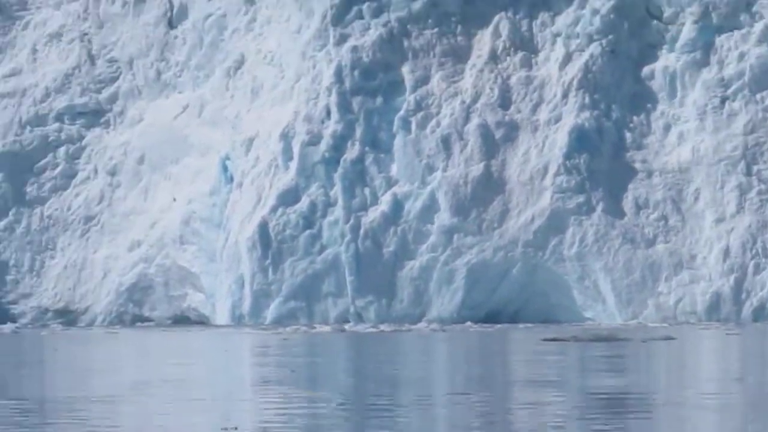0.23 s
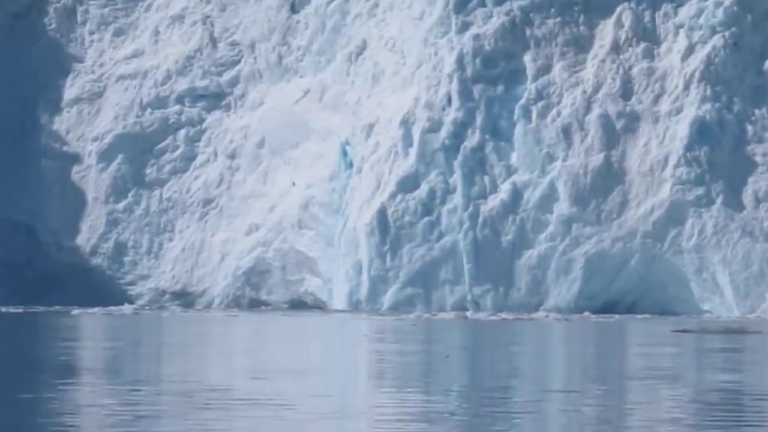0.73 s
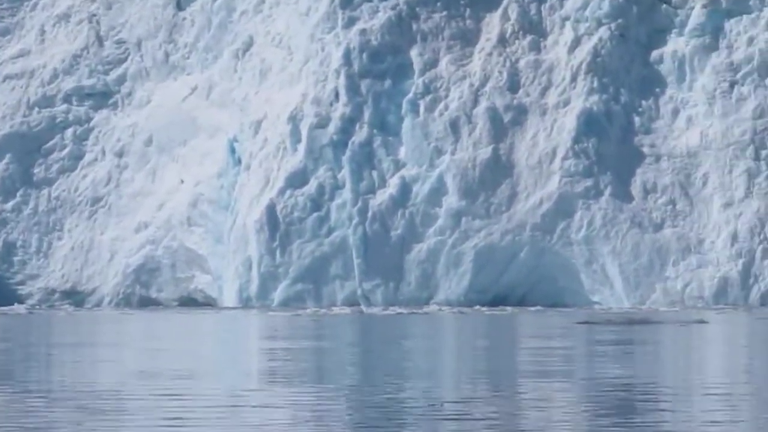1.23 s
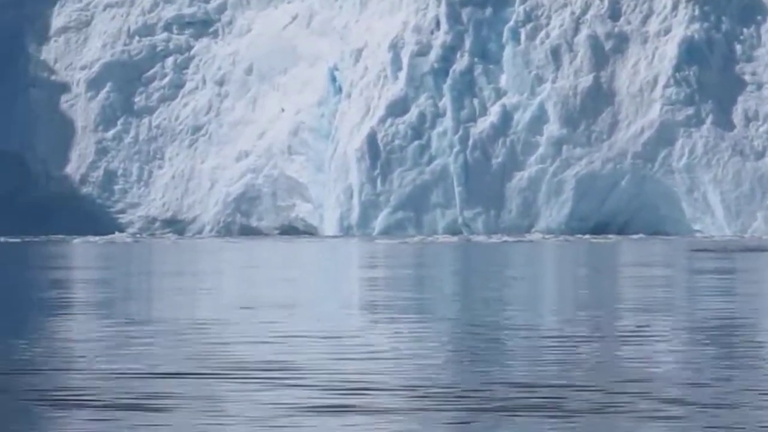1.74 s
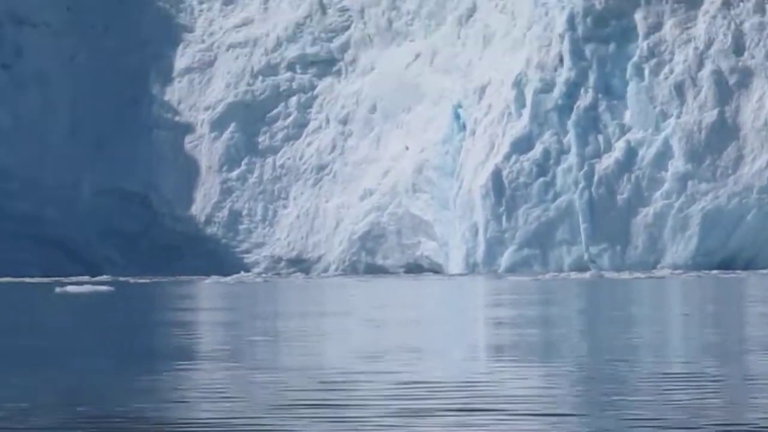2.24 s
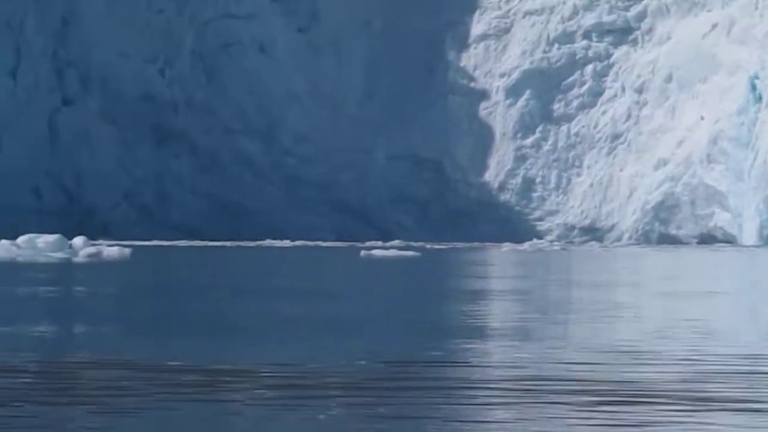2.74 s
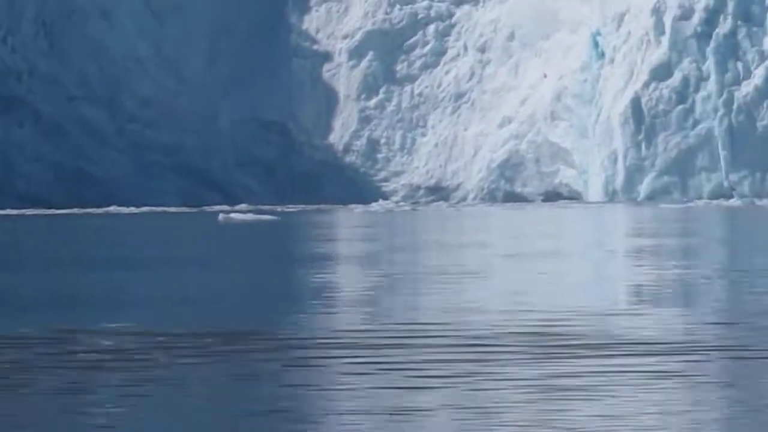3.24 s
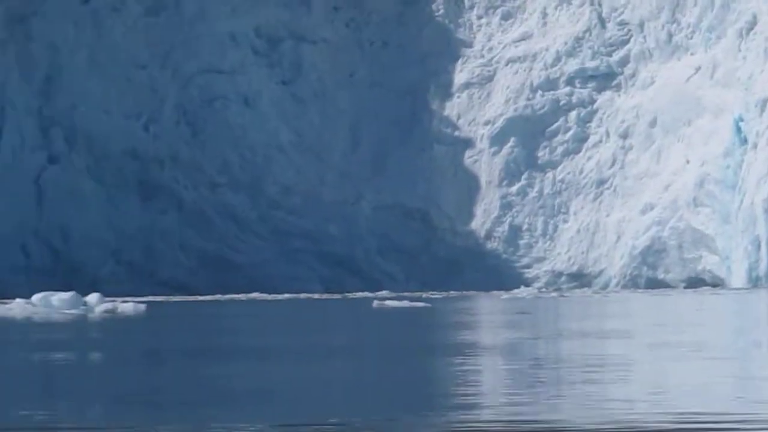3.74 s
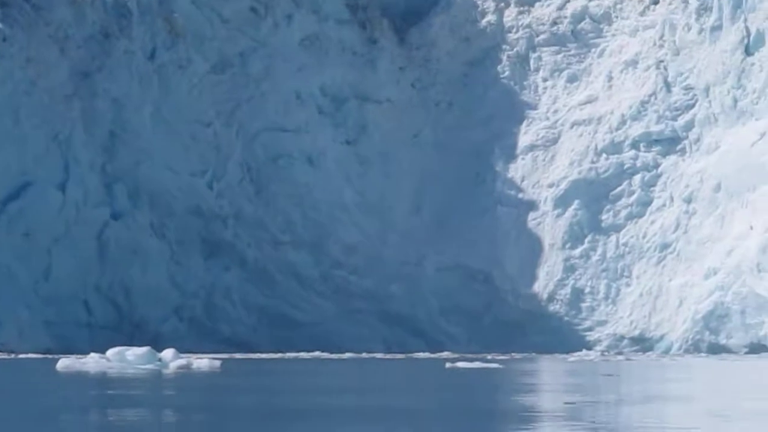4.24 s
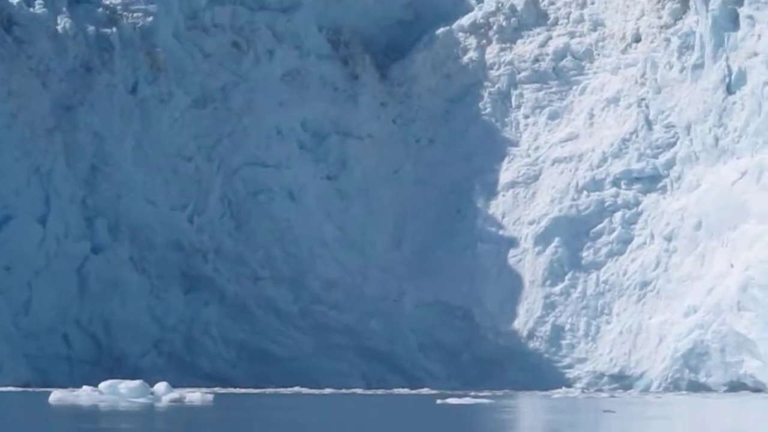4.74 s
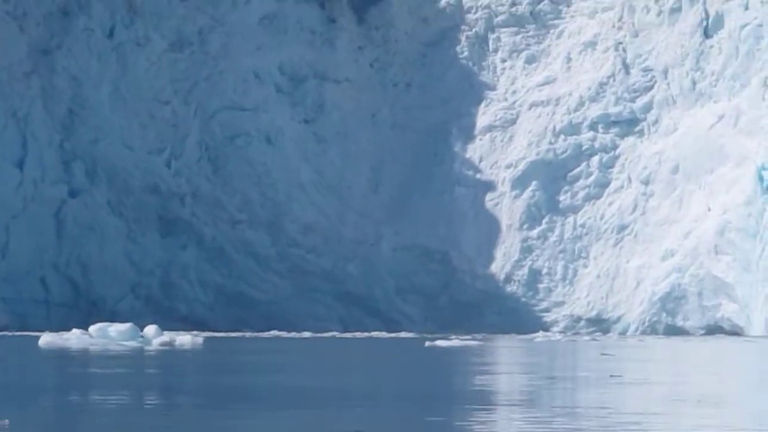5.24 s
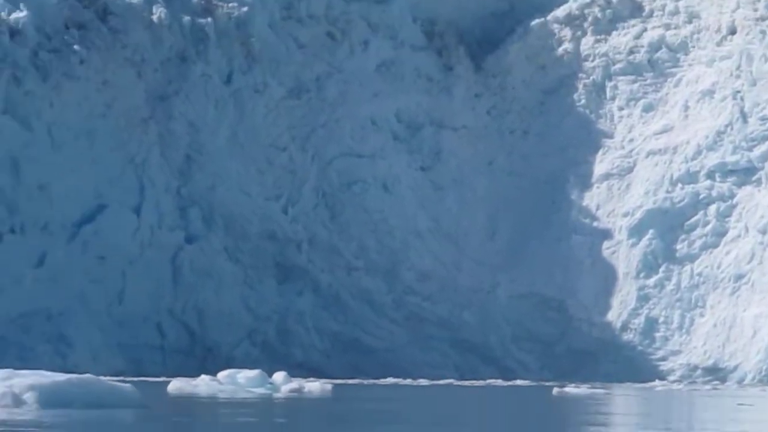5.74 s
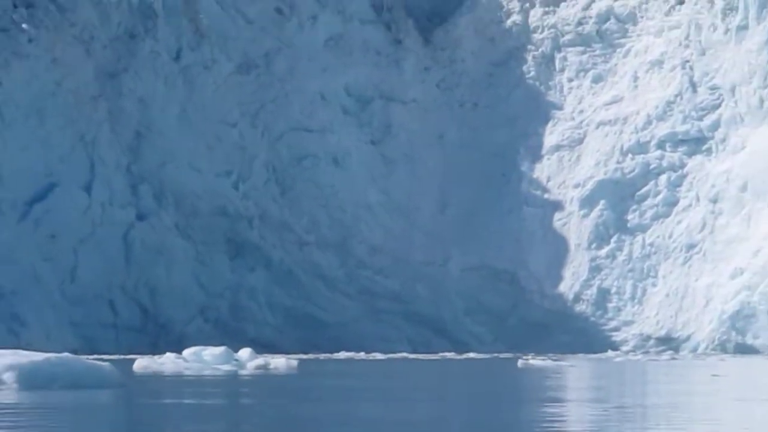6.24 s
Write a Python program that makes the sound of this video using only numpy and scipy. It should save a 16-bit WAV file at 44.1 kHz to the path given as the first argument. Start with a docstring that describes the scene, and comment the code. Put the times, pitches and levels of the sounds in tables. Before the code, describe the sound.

Distant glacier ice collapses with a swelling deep rumble and heavy thumps, while close water splashes, drips and gurgles around a small boat.

```python
"""Sea below a distant glacier face: ice breaks off, a rumble swells into heavy thumps over a steady wash.
Close by, water splashes around a small boat: mist, spray, gurgling, single drops and bubbles.
Rumble, wash and wind are shaped noise; splashes are grains of short rings; drops, bubbles and thumps are
placed singly. Two close ports hear it all; the near water differs in phase between them.
Gain ducks under loud passages, then peaks are limited and the top of the band is cut."""
import sys
import numpy as np
from scipy import signal
from scipy.fft import rfft, irfft
from scipy.io import wavfile
from scipy.ndimage import uniform_filter1d, minimum_filter1d

SR = 44100
rng = np.random.default_rng(int(sys.argv[2]) if len(sys.argv) > 2 else 0)


def materialize(psi):
    """Save the field psi as 16-bit PCM at rate SR to the path in sys.argv[1].

    A 1-D psi becomes a single channel; in a 2-D psi each row is a channel.
    """
    bounded = np.clip(np.atleast_2d(psi).T, -1, 1)
    quanta = np.round(bounded * 32767).astype(np.int16)
    wavfile.write(sys.argv[1], SR, quanta)


N = 285324

# ice collapse: (time [s], level [dB], tilt [dB/octave, easing off below 150 Hz])
COLLAPSE_LEVEL_TILT = [(0.0, -31, 6.5), (0.5, -33, 8), (0.8, -36, 2), (1.18, -28.5, 2.5),
                       (1.55, -32.5, 10.5), (2.0, -28, 6), (2.45, -24.5, 3), (3.02, -26.5, 3.5),
                       (3.25, -24, 3.5), (3.55, -24, 2.5), (3.63, -18.5, 5), (3.95, -18, 5.5),
                       (4.19, -24.5, 2), (4.24, -14, 2), (4.38, -8, -1), (4.47, -14.5, 1.5),
                       (4.55, -9.5, 2.5), (4.7, -12, -2), (5.15, -22.5, -0.5), (5.75, -26, 4),
                       (5.97, -21.5, 3.5), (6.37, -20.5, 5), (6.47, -15.5, -2)]
# rumble colour before tilt: (frequency [Hz], relative density [dB])
RUMBLE_COLOUR = [(12, -58.5), (20, -10), (107, -1), (136, -5), (178, -4), (229, -13), (265, -9.5),
                 (329, -18), (373, -18), (812, -38.5), (1500, -58.5), (1950, -56), (3300, -120)]
# single blocks landing: (start [s], level [dB], pitch [Hz], length [cycles])
BLOCK_THUMPS = [(3.21, -13, 126, 2.1), (3.6, -15, 102, 2.1), (3.908, -4.5, 114, 1.5),
                (3.938, 0.5, 189, 2.25), (3.981, -4.5, 162, 1.3), (4.292, -4, 128.5, 2.1),
                (4.325, -5.5, 188, 2.2), (4.357, -9.5, 108, 2.3), (4.393, 1.5, 100, 2.1),
                (4.484, -5.5, 176, 1.5), (4.531, -3, 79, 1.5), (4.553, 0.5, 144, 1.7), (4.621, 1, 215, 1.6),
                (6.439, -5.5, 100.5, 2.3)]

# level of the water layers between splashes: (time [s], mist [dB], spray [dB], gurgle [dB])
CHURN_LEVELS = [(0.0, -56.5, -62, -45), (1.3, -57.5, -60, -50.5), (2.1, -52.5, -58, -44),
                (2.65, -48, -49, -38.5), (3.2, -54, -62, -45.5), (4.15, -51.5, -51, -41.5),
                (4.6, -65, -71, -52), (5.0, -55, -61, -48.5), (5.5, -68, -59.5, -50.5),
                (6.47, -54, -52, -41.5)]
# wavelets slapping the hull; rise and fall each span SWELL_DB:
# (peak time [s], rise [s], fall [s], mist peak [dB], spray peak [dB], gurgle peak [dB])
HULL_SPLASHES = [(0.2, 0.17, 0.33, -50, -42.5, -34.5), (0.39, 0.077, 0.1, -44, -46, -39.5),
                 (0.63, 0.32, 0.14, -38, -39, -31), (0.72, 0.18, 0.075, -35, -32.5, -37),
                 (0.95, .3, 0.5, -51, -47, -58), (1.21, 0.095, 0.11, -58, -44, -42),
                 (1.42, 0.083, 1, -64, -53, -44.5), (1.76, 0.37, 0.2, -38, -35, -30.5),
                 (2.32, 0.11, .15, -49, -51, -57), (2.43, 0.033, .15, -50, -37.5, -39),
                 (2.84, 0.11, 0.21, -39.5, -37.5, -39.5), (2.98, 0.067, 0.08, -38.5, -35.5, -37),
                 (3.23, .2, 0.15, -60, -48, -50), (3.49, 0.099, 0.66, -51, -34.5, -30),
                 (3.94, 0.16, 0.19, -41, -36, -31.5), (4.23, 0.12, 0.45, -51, -45.5, -39),
                 (5.65, 0.062, 0.084, -47.5, -47, -44), (5.78, 0.033, 0.078, -43, -42, -36.5),
                 (5.9, 0.21, .25, -46, -60, -59), (6.03, 0.16, 0.14, -56, -40.5, -42.5)]
SWELL_DB = 20
# spray colour: (frequency [Hz], gain [dB])
SPRAY_COLOUR = [(1180, -40), (2000, -19.5), (3550, 0.5), (3900, 1.5), (5940, 0.5), (6470, 2), (7480, 0.5),
                (8730, -12), (10700, -11.5), (15500, -26)]

# drops landing: (start [s], snap level [dB], nominal ring [Hz], body level [dB])
LANDING_DROPS = [(0.022, -19.5, 5420, -23), (0.188, -28.5, 4020, -35), (0.2818, -17, 2900, -27),
                 (0.3123, -20, 6440, -44), (0.377, -29, 5450, -39), (0.4443, -28, 2630, -30),
                 (0.486, -49, 2630, -19.5), (0.602, -19, 5200, -32), (0.6417, -19, 6130, -30),
                 (0.679, -20, 5900, -29), (0.7076, -10, 5110, -13), (0.7194, -19, 4230, -37),
                 (0.8419, -26.5, 2900, -29), (0.928, -29, 3850, -40), (0.9448, -22, 6150, -50),
                 (1.023, -24, 4640, -28), (1.1747, -29, 4000, -38), (1.202, -26, 4400, -32),
                 (1.2177, -28.5, 4150, -39), (1.648, -24, 3350, -26), (1.732, -14.5, 5780, -30),
                 (1.758, -14.5, 5430, -38), (1.7718, -15, 2720, -21), (1.7923, -19.5, 4100, -27),
                 (2.259, -24, 2700, -30), (2.4165, -23.5, 2580, -46), (2.4756, -32, 2750, -26),
                 (2.8563, -17, 6100, -40), (2.8873, -20, 3720, -23), (2.971, -7, 4620, -5.5),
                 (2.9844, -17.5, 3700, -19), (3.1865, -27, 4900, -30), (3.243, -25, 2950, -32.5),
                 (3.4136, -19.5, 5240, -24.5), (3.467, -20.5, 2610, -30), (3.4962, -16.5, 2940, -10.5),
                 (3.5852, -22, 4360, -28), (3.921, -20.5, 6300, -38), (4.036, -24, 3250, -29),
                 (4.155, -25, 7030, -30), (4.1902, -22, 6300, -36), (4.621, -35.5, 4830, -47),
                 (4.7646, -34, 6490, -43), (4.9801, -34.5, 5860, -44), (5.113, -21.5, 4080, -45),
                 (5.442, -28, 4550, -47), (5.609, -16.5, 4700, -48), (5.7542, -22.5, 5840, -40),
                 (5.784, -29, 4470, -28), (5.7972, -20, 4200, -22), (5.835, -29, 5170, -51),
                 (5.861, -24.5, 3140, -49), (6.0233, -30.5, 5200, -30)]
# colour of the drop snaps: (frequency [Hz], gain [dB])
SNAP_COLOUR = [(1500, -46), (2600, 3.5), (5000, 9.5), (7500, 1), (10000, -10.5), (15500, -29.5)]
# ringing trapped air: (start [s], level [dB], start pitch [Hz],
# glide base [ratio, to the power 1.84 by the end], length scale [s, tone lasts 1.28 of it])
RINGING_BUBBLES = [(0.207, -30, 1330, 0.74, .012), (0.229, -25.5, 1310, 1.1, 0.012),
                   (0.254, -22, 676, 1.53, 0.036), (0.64, -27, 1250, 1.05, 0.015),
                   (0.665, -24.5, 750, 0.84, 0.012), (0.709, -12.5, 1355, 1, 0.0061),
                   (0.75, -33, 6860, 1.13, 0.029), (0.752, -19, 1780, 2.4, 0.012),
                   (0.874, -30, 750, 1.16, 0.023), (1.031, -33, 1170, 0.94, 0.018),
                   (1.664, -26.5, 1234, 0.89, 0.025), (1.753, -25, 853, 0.98, 0.031),
                   (1.806, -25.5, 1895, 1.02, 0.013), (2.894, -23, 1270, 1.1, 0.0092),
                   (2.948, -30, 1096, 1.7, 0.026), (3.477, -18.5, 2310, 1.13, 0.0077),
                   (3.496, -25, 1404, 1.1, 0.023), (3.501, -18, 2070, 1.07, 0.014),
                   (3.538, -21.5, 1410, 1, 0.0078), (3.552, -18.5, 1670, 1.12, 0.0087),
                   (3.606, -25.5, 1100, 0.93, 0.017), (5.054, -31.5, 2650, 2, 0.0099),
                   (5.952, -32, 2760, 1.9, 0.012), (0.8, -38, 2100, 2.4, 0.0095),
                   (5.747, -19, 580, 1.12, 0.016), (5.763, -24, 640, 1.09, 0.012),
                   (5.78, -22.5, 750, 0.99, 0.019), (6.221, -20, 637, 1.13, 0.012)]

# wind at the ports: (time [s], level [dB], left minus right [dB])
WIND_GUSTS = [(0, -31, 5), (.8, -37.5, -10), (1.05, -30, -10.5), (1.45, -28.5, -7), (1.9, -34, -1),
              (3.4, -32.5, 1), (4.2, -27.5, 8), (4.4, -38, -2), (5, -29, 2), (5.6, -28, 4),
              (6.47, -30.5, 10)]
# wind colour: (frequency [Hz], relative density [dB])
WIND_COLOUR = [(8.8, -34), (15, -9), (43, 4), (65, 5), (107, -6), (300, -38), (390, -56), (660, -120)]
# sea wash colour: (frequency [Hz], relative density [dB])
WASH_COLOUR = [(88, -8.5), (150, -3.5), (290, -6.5), (445, -5.5), (572, -6.5), (1040, -21), (2020, -23),
               (3550, -43.5), (4840, -58), (5990, -57), (7410, -47.5), (15500, -59)]
WASH_DB = -33
# sea wash likeness of the channels: (frequency [Hz], correlation [0-1])
WASH_LIKENESS = [(200, 1), (700, 0.93), (2000, 0.26), (6000, .5), (14000, .4)]

# phase by which the left port leads on near sound: (frequency [Hz], phase [rad])
PORT_LEAD_PHASE = [(100, 0), (2070, .4), (3270, 2.), (3700, 2.3), (6200, 1.5), (8010, 4.2), (9910, 6.1),
                   (15400, 6.5)]
# colour difference of the ports: (frequency [Hz], left minus right [dB])
PORT_COLOUR_TILT = [(60, -1.5), (400, 0), (1290, -0.5), (2380, 1.5), (4400, 6), (6000, -0.5), (8120, -10.5),
                    (12000, -2)]
EDGE_HZ = 15750


def gain_of(db):
    """Decibels to amplitude ratio."""
    return 10 ** (np.asarray(db) / 20)


def evened(x):
    """Scale to unit RMS."""
    return x / np.sqrt(np.mean(x ** 2) + 1e-20)


def read(points, hz):
    """Interpolate a frequency table on a logarithmic axis."""
    table_hz, value = np.transpose(points)
    return np.interp(np.log(hz + 1), np.log(table_hz + 1), value)


def curve(rows, column, t_s):
    """Interpolate one column of a time table."""
    table = np.array(rows)
    return np.interp(t_s, table[:, 0], table[:, column])


def add(mix, start_s, sound):
    """Mix a sound in place, cut at the end of the mix."""
    part = mix[..., round(start_s * SR):][..., :sound.shape[-1]]
    part += sound[..., :part.shape[-1]]


def coloured(x, points):
    """Filter by a gain table in dB, without phase shift."""
    hz = np.fft.rfftfreq(N, 1 / SR)
    return irfft(rfft(x) * gain_of(read(points, hz)), N)


def noise(size, level_db, likeness, patchy_db):
    """Two-channel noise from random short-time spectra, coloured by level_db(hz, t_s), in drifting patches."""
    frames = 4 * N // size + 5
    hz = np.fft.rfftfreq(size, 1 / SR)[:, None]
    a, b, c, d, patches = rng.standard_normal((frames, len(hz), 5)).T
    patches = uniform_filter1d(patches, size=10, axis=0)  # across frequency
    patches = evened(uniform_filter1d(patches, size=12, axis=1))  # across time
    same = np.clip(likeness(hz), -1, 1)
    left = a + 1j * b
    right = same * left + np.sqrt(1 - same ** 2) * (c + 1j * d)
    frame_s = np.arange(frames) * size / 4 / SR
    spectra = np.array([left, right]) * gain_of(level_db(hz, frame_s) + patchy_db * patches)
    _, sound = signal.istft(spectra, nperseg=size, noverlap=size * 3 // 4)
    return evened(sound[:, :N])


def grains(low_hz, high_hz, cycles, glide, per_s, spread_db):
    """Many short decaying rings of random pitch at random moments; a few are large."""
    size_db = spread_db * np.minimum(rng.exponential(1, N), 5)
    size = gain_of(size_db) * (rng.random(N) < per_s / SR)
    kind = rng.integers(0, 20, N)
    out = np.zeros(N)
    for k, hz in enumerate(np.geomspace(low_hz, high_hz, 20)):
        turns = np.arange(1500) * hz / SR
        envelope = turns * np.exp(-3 * turns / cycles)
        ring = envelope * np.sin(2 * np.pi * turns * (1 + glide * turns))
        out += signal.oaconvolve(size * (kind == k), ring / np.linalg.norm(ring))[:N]
    return evened(out)


def collapse():
    """Falling ice: far rumble with evened short-term power set to a level curve, plus block thumps."""
    t_s = np.arange(N) / SR

    def colour_db(hz, s):
        return read(RUMBLE_COLOUR, hz) + curve(COLLAPSE_LEVEL_TILT, 2, s) * np.log2(hz / 150 + 0.29)

    rumble = noise(2048, colour_db, lambda hz: 0.988 + 0 * hz, patchy_db=2.5)
    rumble /= np.sqrt(uniform_filter1d((rumble ** 2).mean(0), size=2200))
    rumble *= gain_of(curve(COLLAPSE_LEVEL_TILT, 1, t_s))
    thumps(rumble)
    return rumble


def thumps(mix):
    """Blocks landing: each adds a few cycles of a low sine under a half-sine envelope."""
    for start_s, level_db, hz, cycles in BLOCK_THUMPS:
        turns = np.arange(3000) * hz / SR
        envelope = np.sin(np.pi * np.clip(turns / cycles, 0, 1))
        add(mix, start_s, gain_of(level_db) * envelope * np.sin(2 * np.pi * turns))


def splash():
    """Water at the hull: fine mist, coarser spray and gurgling bubbles, each with its own swell."""
    t_s = np.arange(N) / SR
    droplets = spray() + 1.16 * np.array([spray(), spray()])  # shared + one per side
    high = signal.butter(2, 5000, "high", fs=SR, output="sos")
    low = signal.butter(2, 5000, "low", fs=SR, output="sos")
    mist = evened(signal.sosfiltfilt(high, droplets))
    coarse = evened(signal.sosfiltfilt(low, droplets))
    layers = (mist, coarse, gurgle())
    return sum(churn_gain(k, t_s) * layer for k, layer in enumerate(layers))


def spray():
    """Falling droplets: fine crackle and small pips over a hiss, arriving in clumps."""
    fizz = grains(low_hz=2250, high_hz=10800, cycles=1.7, glide=0.005, per_s=2300, spread_db=4.5)
    pips = grains(low_hz=2400, high_hz=8000, cycles=9, glide=0.003, per_s=220, spread_db=5)
    hiss = rng.standard_normal(N)
    clumps = uniform_filter1d(rng.standard_normal(N), size=500)
    clumps = evened(uniform_filter1d(clumps, size=500))
    mixed = coloured(fizz + 0.9 * pips + 0.5 * hiss, SPRAY_COLOUR)
    return evened(mixed * gain_of(2.6 * clumps))


def gurgle():
    """Gurgling bubbles: dense low rings, partly shared by the sides, with longer blips."""
    shared, left, right = (
        grains(low_hz=750, high_hz=2900, cycles=4.9, glide=0.0082, per_s=700, spread_db=3) for _ in range(3))
    blips = grains(low_hz=700, high_hz=3000, cycles=14, glide=0.003, per_s=160, spread_db=4)
    return evened(shared + 0.7 * blips + 0.64 * np.array([left, right]))


def churn_gain(layer, t_s):
    """Gain of one water layer: churn power plus splashes that rise and fall exponentially."""
    power = gain_of(curve(CHURN_LEVELS, 1 + layer, t_s)) ** 2
    for peak_s, rise_s, fall_s, *peak_db in HULL_SPLASHES:
        distance = np.maximum((peak_s - t_s) / rise_s, (t_s - peak_s) / fall_s)
        power += gain_of(peak_db[layer] - SWELL_DB * distance) ** 2
    return np.sqrt(power)


def drops():
    """Drops landing: a short wide snap, strongest around its rising ring, with a duller body."""
    snaps, bodies = np.zeros((2, N)), np.zeros((2, N))
    t_s = np.arange(1000) / SR
    fade = gain_of(-60 * t_s / 0.012) * (1 - np.exp(-t_s / 0.00064)) * 1.61
    body_band = signal.butter(2, [650, 2600], "band", fs=SR, output="sos")
    bursts = rng.standard_normal((len(LANDING_DROPS), 3, 1000))  # shared, left, right
    for (start_s, snap_db, hz, body_db), burst in zip(LANDING_DROPS, bursts):
        ring_band = signal.butter(2, [hz * 0.94, hz * 1.25], "band", fs=SR, output="sos")
        near_ring = evened(signal.sosfilt(ring_band, burst[0]))
        ring = np.sin(2 * np.pi * hz * t_s * (0.95 + 25 * t_s))
        wide = burst[0] + 1.6 * burst[1:]
        snap = 0.44 * wide + 0.089 * near_ring + 0.46 * ring
        body = evened(signal.sosfilt(body_band, burst[0] + 0.59 * burst[1:]))
        add(snaps, start_s, gain_of(snap_db) * snap * fade)
        add(bodies, start_s, gain_of(body_db) * body * fade)
    return coloured(snaps, SNAP_COLOUR) + bodies


def bubbles():
    """Trapped air: short clean tones that slide as the bubble nears the surface."""
    out = np.zeros(N)
    for start_s, level_db, hz, glide, length_s in RINGING_BUBBLES:
        progress = np.arange(0, 1, 1 / (SR * length_s * 1.28))
        turns = np.cumsum(hz * glide ** (1.84 * progress)) / SR
        envelope = np.sin(np.pi * progress ** 0.22)  # fast attack, slow fall
        add(out, start_s, gain_of(level_db) * envelope * np.sin(2 * np.pi * turns))
    return out


def wind():
    """Gusts on the ports: lumpy low buffeting, almost unrelated between them."""
    t_s = np.arange(N) / SR
    side = np.array([[0.5], [-0.5]])
    level_db = curve(WIND_GUSTS, 1, t_s) + curve(WIND_GUSTS, 2, t_s) * side
    buffeting = noise(2048, lambda hz, s: read(WIND_COLOUR, hz), lambda hz: 0.07 + 0 * hz, patchy_db=1)
    return gain_of(level_db) * buffeting


def wash():
    """Sea and melting brash ice: steady hiss, less alike between channels in the treble."""
    hiss = noise(1024, lambda hz, s: read(WASH_COLOUR, hz), lambda hz: read(WASH_LIKENESS, hz), patchy_db=1.96)
    return gain_of(WASH_DB) * hiss


def ports(near, far):
    """Two ports: near sound gains a phase lead and unlike hull echoes; port colours tilt all sound."""
    hz = np.fft.rfftfreq(N, 1 / SR)
    t_s = np.arange(1500) / SR
    echo = rng.standard_normal((2, 1500)) * gain_of(-60 * t_s / 0.03)
    echo /= np.linalg.norm(echo[0])
    near = near + gain_of(-8) * signal.oaconvolve(near, echo, axes=1)[:, :N]
    lead = np.exp(0.5j * read(PORT_LEAD_PHASE, hz))  # half per side
    tilt = gain_of(read(PORT_COLOUR_TILT, hz) / 2)
    spectra = rfft(near) * np.array([lead, 1 / lead]) + rfft(far)
    return irfft(spectra * np.array([tilt, 1 / tilt]), N)


def scene():
    """Near water and far ice, sea and wind, heard at the two ports."""
    near = drops() + splash() + bubbles()
    far = collapse() + wash() + wind()
    return ports(near, far)


def record(dry):
    """Gain control ducks loud passages with slow recovery; limiter, clip and low-pass follow."""
    power = abs(uniform_filter1d((dry ** 2).mean(0), size=2000))
    power_db = 10 * np.log10(power + 1e-12)
    fall_db = np.arange(N) * 2.9 / SR  # held peak falls 2.9 dB/s
    held_db = np.maximum.accumulate(power_db + fall_db) - fall_db
    over_db = np.maximum(held_db + 12.5, 0)
    ducked = dry / gain_of(0.36 * uniform_filter1d(over_db, size=600))
    # quick limiter; the highest crests still clip
    room = minimum_filter1d(1 / np.maximum(abs(ducked).max(0) / 1.04, 1), size=161)
    capped = np.clip(ducked * uniform_filter1d(room, size=81), -1, 1)
    low_pass = signal.firwin(511, EDGE_HZ, window=("kaiser", 9), fs=SR)
    return signal.oaconvolve(capped, low_pass[None], "same")


dry = scene()
out = record(dry)
materialize(out)
```